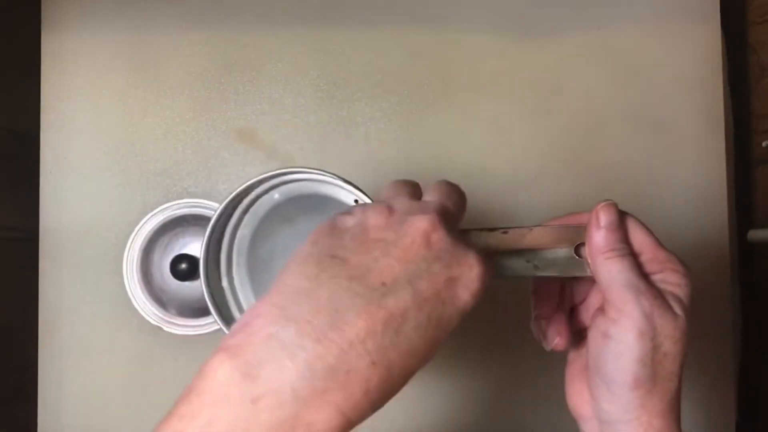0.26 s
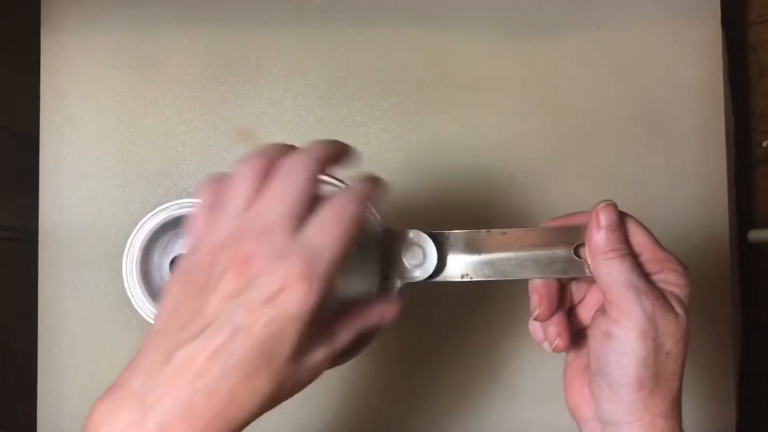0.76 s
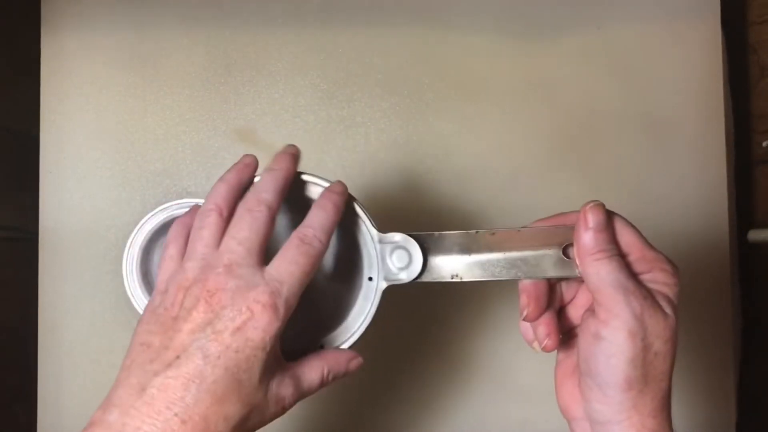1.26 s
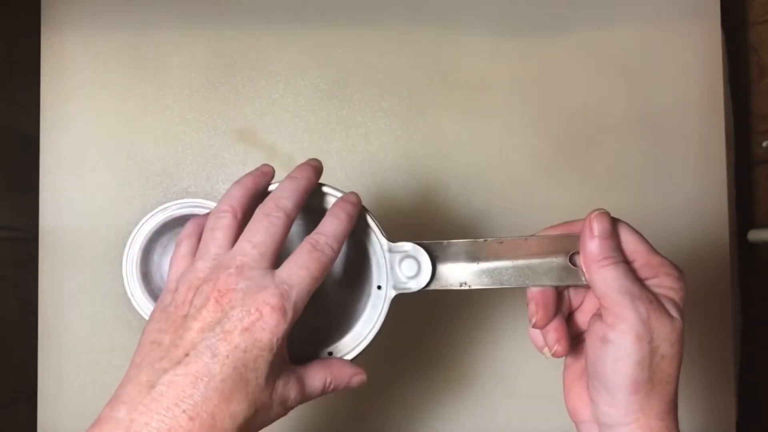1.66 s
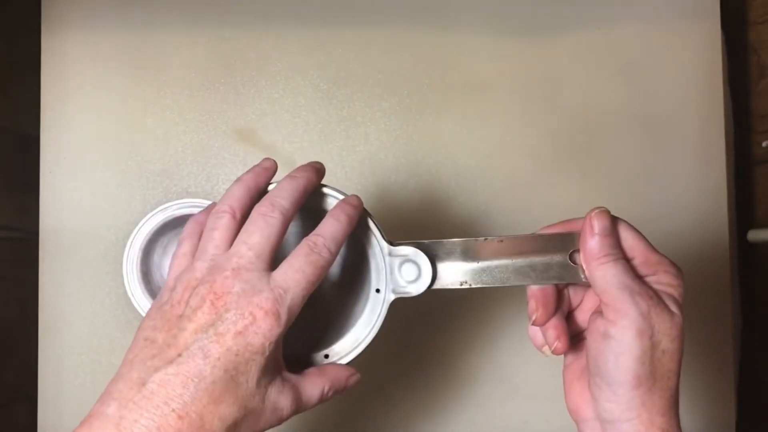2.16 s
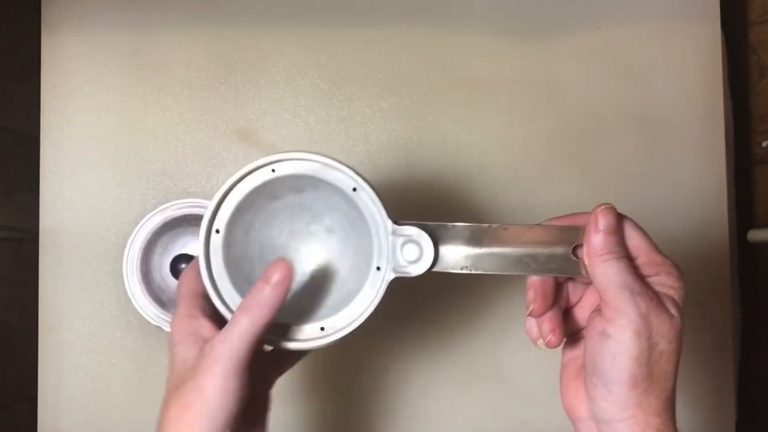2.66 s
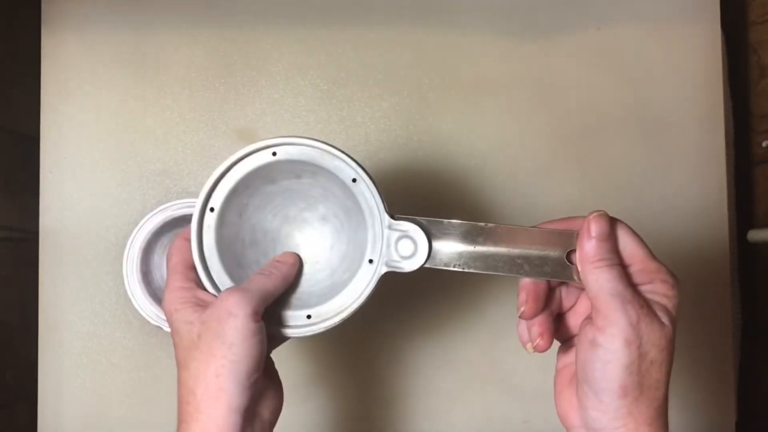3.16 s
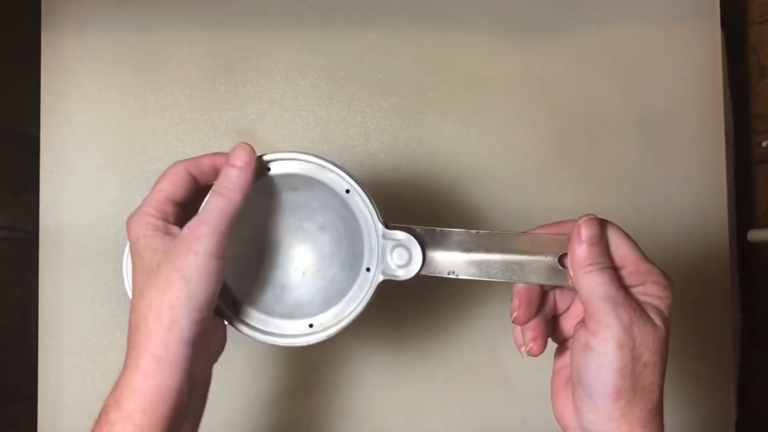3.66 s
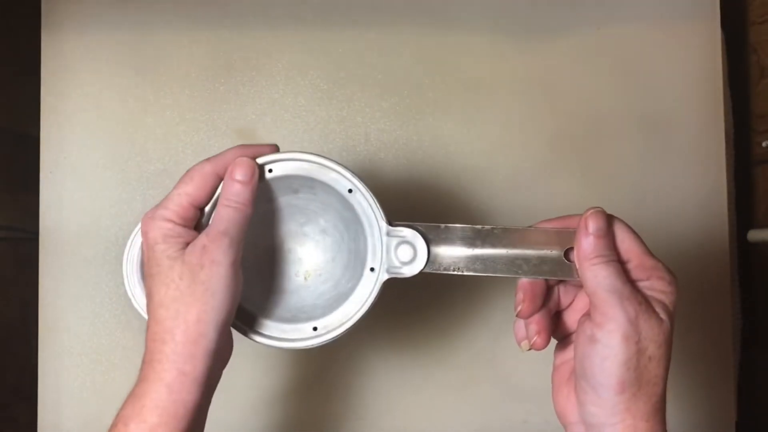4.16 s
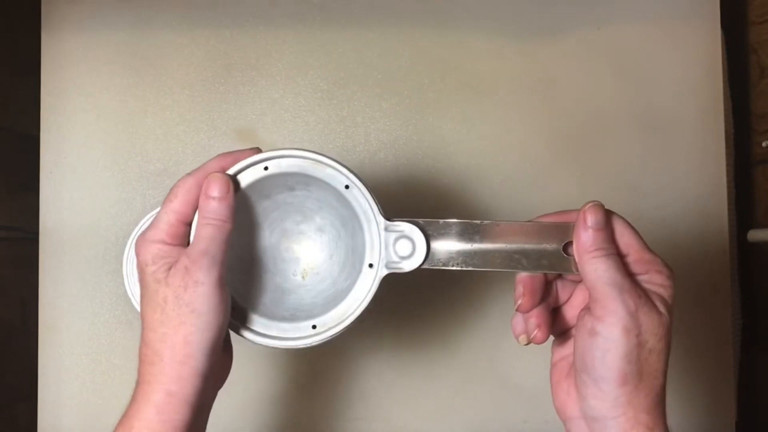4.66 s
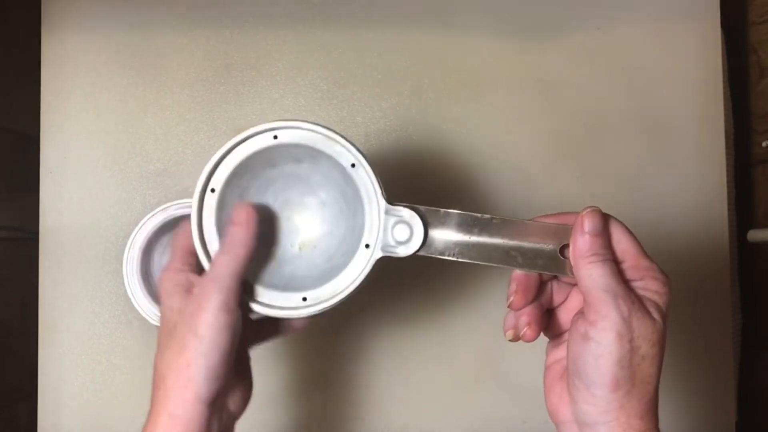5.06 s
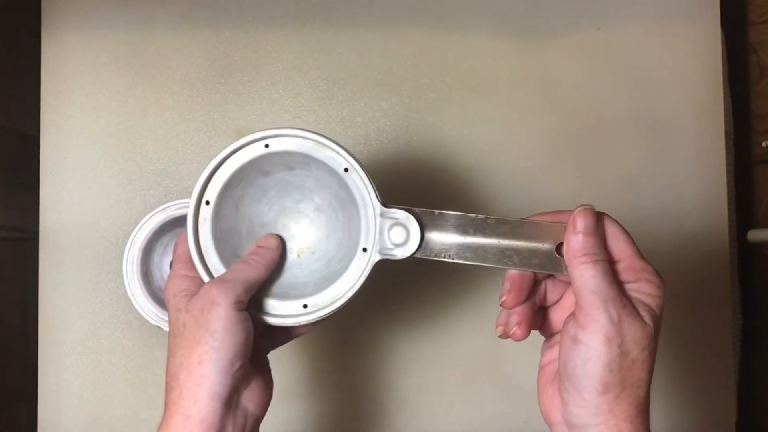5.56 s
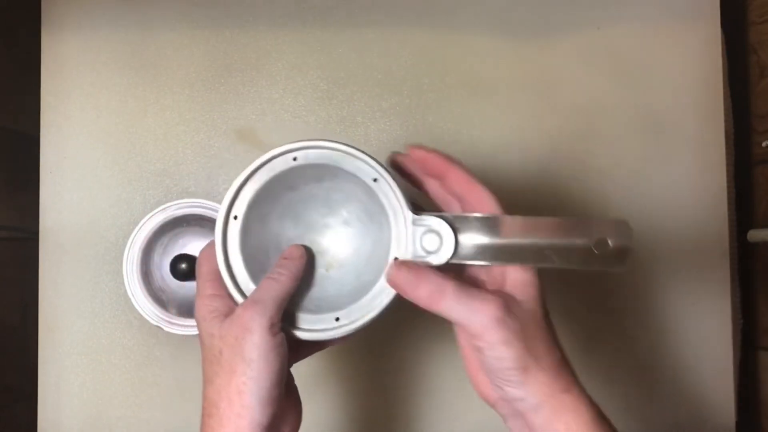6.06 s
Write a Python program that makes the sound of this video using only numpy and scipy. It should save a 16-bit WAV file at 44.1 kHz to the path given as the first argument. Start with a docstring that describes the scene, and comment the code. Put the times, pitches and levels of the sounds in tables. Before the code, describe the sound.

Close up in a quiet kitchen, lightweight aluminum rattles and rings briefly as a cup drops into a small handheld pan. After a lull of soft finger friction, the pieces knock together a few more times, with gentle scuffs and faint squeaks in between and a last tap at the end. A low appliance hum, slight hiss and very faint electric whine continue underneath.

```python
"""Over a low appliance hum, a faint electric whine and hiss, a thin aluminium cup clatters into its
small pan in a quiet kitchen and is then shifted about by hand. Each impact excites the normal modes
of the metal and of the air between the two shells, and the holding hand damps them quickly.
Rubbing fingers drive the metal by stick-slip friction, and now and then a single mode squeaks."""
import sys
import numpy as np
from scipy import signal
from scipy.fft import rfft, irfft
from scipy.io import wavfile

SR = 44100
rng = np.random.default_rng(int(sys.argv[2]) if len(sys.argv) > 2 else 0)


def transcribe(u):
    """Save the signal u as a 16-bit wav file named by the first command-line argument.

    u: samples, shape (n,) or (channels, n), limited to [-1, 1]; the rate is SR.
    q: integer samples, one column per channel.
    """
    v = np.clip(np.atleast_2d(u).T, -1, 1)
    q = np.round(v * 32767).astype(np.int16)
    wavfile.write(sys.argv[1], SR, q)


N = 278712
CUTOFF_HZ = 16300

# Normal modes of the pan, by the part that carries them. Each row: frequency in Hz,
# relative level in dB, nominal t60 in seconds (scaled for each kind of touch).
BOTTOM_MODES = [(573.8, 3, 0.099), (650, -9, 0.11)]
WALL_MODES = [(749, -24, 0.19), (918, -15, 0.14), (1013, -12.5, 0.047), (1130, -6, 0.038),
              (1241.6, -3.5, 0.086)]
FLANGE_MODES = [(1620, -5, .05), (1915, 0, .06), (2090, -6, .05), (2570, -9, .05), (2970, -4, .05)]
RIM_MODES = [(3490, -6, .06), (3745, -3, .06), (4160, -8, .04), (4320, -4, .07), (4760, -5, .05),
             (4900, -1, .04), (5070, -5, .05), (5345, -2, .05), (6100, -9, .06), (6330, -6, .05),
             (7255, -2, .06), (7555, -7, .04)]
EDGE_MODES = [(8322, -2, 0.07), (9020, 4, 0.027), (10120, -0.5, 0.03), (11490, 6.5, .035),
              (11800, -8, 0.038), (15000, -6, .035), (13580, 2.5, 0.033)]


def amp(db):
    """Amplitude ratio of a level in decibels."""
    return 10 ** (np.asarray(db) / 20)


def unit_rms(x):
    """Normalisation to unit mean power."""
    return x / np.sqrt(np.mean(x ** 2) + 1e-20)


def ring(force, hz, t60):
    """Damped harmonic oscillator: a unit impulse starts a decaying sine of height 1."""
    r, w = amp(-60 / (t60 * SR)), 2 * np.pi * hz / SR
    return signal.lfilter([0, np.sin(w)], [1, -2 * r * np.cos(w), r * r], force + 1e-18)


def band(x, low_hz, high_hz):
    """Butterworth band-pass filtering."""
    return signal.sosfilt(signal.butter(2, [low_hz, high_hz], "band", fs=SR, output="sos"), x)


def coloured(spectrum):
    """Spectral shaping of white noise, at unit rms."""
    hz, db = np.transpose(spectrum)
    bins_hz = np.maximum(np.arange(N // 2 + 1) * SR / N, 1)
    gain = amp(np.interp(np.log(bins_hz), np.log(hz), db))
    return unit_rms(irfft(rfft(rng.standard_normal(N)) * gain, N))


def background():
    """Superposition of narrow-band noise (wavering hum), a harmonic series (whine) and broadband air."""
    # Each row: centre frequency in Hz, bandwidth in Hz, level in dB.
    hum_lines = [(58.8, 13, -57.5), (119.7, 1.5, -63), (136.3, 1.6, -71), (175, 3.4, -72.5)]
    # Room air and hiss. Each row: frequency in Hz, relative spectral density in dB.
    air_spectrum = [(15, -42.5), (25, -7.5), (58, 2), (121, -7), (295, -24.5), (347, -20.5), (432, -28),
                    (723, -27.5), (1060, -29.5), (2960, -36), (4700, -40), (6160, -39), (7450, -42.5),
                    (14300, -41), (16400, -51.5)]
    whine_hz, tilt_db = 991.6, -.75
    t = np.arange(N) / SR
    hum = sum(amp(db) * unit_rms(band(rng.standard_normal(N + SR), hz - width / 2, hz + width / 2)[SR:])
              for hz, width, db in hum_lines)
    whine = sum(amp(-83.5 + k * tilt_db) * np.sin(2 * np.pi * (k * whine_hz * t + rng.random()))
                for k in range(1, 16))
    return hum + whine + amp(-59) * coloured(air_spectrum)


def contact(level_db, hardness_db, bottom_db, hollow_hz, rim_hz, chatter_s, swell_s):
    """Modal excitation: a click or a swelling slide, with a dying chatter of bounces, rings the pan."""
    # Dense fine modes, heard as a crack, for wall, bottom, flange, rim and edge. Each row: lower and
    # upper band limit in Hz, share of the crack in dB, radiation gain of the whole part in dB.
    fine_modes = [(698.5, 1500, -5, -18), (420, 1000, -15.5, -17.5), (1401, 3200, 2, -21.5),
                  (2960, 5570, -0.5, -20.5), (8300, 21000, 4.5, -26.5)]
    # Bias of every contact towards wall, flange, rim and edge, in dB.
    bias_db = [.3, -1.5, 1.3, -1.8]
    grip = .85   # the holding hand shortens every ring
    coupling_db_per_octave = 6.5   # wall modes far from the hollow's pitch are driven less
    t = np.arange(8192) / SR
    swell = (1 - np.exp(-t / max(swell_s, 1e-6))) ** 1.9
    dying = amp(-60 * t / max(chatter_s, .003))
    bounces = rng.standard_normal(t.size) * (rng.random(t.size) < .06) * dying * swell * 0.46
    bounces[0] = swell_s == 0   # only a knock opens with a click
    crack = rng.standard_normal(t.size) * dying ** 0.5 * swell
    wall = [(hz, db - coupling_db_per_octave * abs(np.log2(hz / hollow_hz)), t60)
            for hz, db, t60 in WALL_MODES]
    hollow = [(hollow_hz, 3.5, .07)]   # the air pocket changes with how the cup sits
    nearest = [(rim_hz, 7.5, .045)]   # the rim mode that the point of contact favours
    # hard contacts reach higher
    wall_db, flange_db, rim_db, edge_db = level_db + hardness_db * np.arange(4) + bias_db
    parts = [(wall + hollow, wall_db), (BOTTOM_MODES, level_db + bottom_db), (FLANGE_MODES, flange_db),
             (RIM_MODES + nearest, rim_db), (EDGE_MODES, edge_db)]
    sound = 0
    for k, (modes, part_db) in enumerate(parts):
        low, high, fine_db, radiation_db = fine_modes[k]
        if k == 0:   # the wall cracks around the pitch of the hollow
            low, high = 0.91 * hollow_hz, 1.5 * hollow_hz
        tones = sum(amp(db + rng.normal(0, 3)) * ring(bounces, hz, grip * t60) for hz, db, t60 in modes)
        tones = unit_rms(band(tones, 0.69 * low, min(1.3 * high, CUTOFF_HZ)))
        fine = amp(fine_db) * unit_rms(band(crack, low, high))
        sound += amp(part_db + radiation_db) * (tones + fine)
    return sound


def knocks_and_scuffs():
    """Impact and sliding friction of metal on metal: a knock starts at once, a scuff swells briefly."""
    # Each row: start in seconds, drive level in dB, hardness in dB per step up the pan,
    # offset of the bottom in dB, resonance of the hollow in Hz, favoured rim mode in Hz.
    knocks = [(0.165, -57.5, -1.1, -14, 1175, 5200), (0.2673, -19, 2.5, -31, 1130, 7250),
              (0.308, -27, 0.2, -27, 1163, 5230), (0.468, -37, 1, -28, 1094, 5530),
              (0.5509, -29.5, -1, -19, 1060, 3590), (0.5905, -34.5, -0.35, -24, 1230, 5340),
              (0.8772, -38, -5.5, -6.5, 893, 5180), (0.9703, -37.5, -4.5, -5.5, 1130, 3500),
              (1.0262, -28.5, -0.6, -1, 1350, 7260), (1.0669, -39.5, -8.5, -35, 894, 5780),
              (2.3105, -43, -5, -18, 695, 4800), (2.7894, -29, -11.5, 0.5, 950, 4800),
              (2.828, -21.5, -4.5, -1, 893, 4600), (2.8394, -24.5, -2, -2, 876, 4900),
              (2.8479, -27.5, -1.9, -5.5, 838, 3400), (2.8684, -41.5, -9, -20, 804, 3500),
              (3.7235, -26, -1.04, 2.8, 1005, 5100), (3.7324, -23.5, -8, -2.5, 895, 5300),
              (4.0112, -60.5, 3.5, 1.1, 904, 4000), (4.2782, -20.5, -0.33, -10, 743, 4850),
              (4.282, -23.5, -4, -25, 1278, 3460), (4.3064, -40.5, -1.5, -30, 770, 3430),
              (4.5137, -35, -1.2, 11, 944, 2780), (4.5444, -40, -7.5, 1, 1090, 2800),
              (5.222, -52.5, -5.5, 1, 843, 3680), (5.5984, -54.5, -8, 3.5, 1793, 3660),
              (5.6126, -57.5, -1.4, 3.5, 1303, 6600), (5.65, -59.5, 0.2, 9.5, 886, 3780),
              (5.704, -50, -13, 0, 1660, 6270), (6.213, -31, -4.5, 8, 700, 4030)]
    # Each row: as for a knock, then the t60 of the chatter in seconds.
    scuffs = [(0.24, -66.5, 3, -15, 1130, 5200, 0.045), (0.857, -59.5, 2, -13, 905, 5970, 0.051),
              (0.288, -30.5, 0.6, -14, 1218, 4430, 0.063), (0.3719, -45, -6, -18, 1197, 4410, 0.03),
              (0.4874, -40, -2.5, -26, 1026, 4410, 0.21), (0.5174, -41.5, -1.5, -12, 980, 5300, .078),
              (0.5696, -33, -3, -12, 1010, 4630, 0.048), (0.8855, -42, -7, -16, 874, 3430, 0.033),
              (0.9394, -42, -5, -4, 1070, 5100, 0.13), (0.9855, -30, -3.5, -6, 1283, 3560, 0.092),
              (1.0092, -27.5, -1, -14, 1008, 5080, 0.046), (1.2424, -60.5, -4.5, 11, 700, 3960, .06),
              (1.7366, -53.5, -5.5, 4.5, 1207, 5340, 0.056), (1.7693, -57, -4.5, 1, 1202, 3280, 0.045),
              (2.3254, -46, -11, 1.1, 1295, 4700, 0.026), (3.522, -58.5, -1.1, -11.5, 1250, 4900, .078),
              (3.8834, -60, 0.1, 8.5, 1144, 6150, .048), (4.678, -58, -1.1, -19, 1310, 5670, .033),
              (4.711, -56, -2, -16, 1240, 6560, 0.07), (4.7698, -58.5, 0.3, -4, 1200, 4330, 0.091),
              (5.0588, -61, -2, -18, 1290, 4600, 0.028), (5.1342, -55.5, -3.5, -16, 1228, 4270, 0.028),
              (5.2532, -61, -2, -2, 1300, 4190, 0.021), (5.3468, -64, 4.1, -7, 1280, 5600, 0.015),
              (5.3918, -48, -3, -22, 870, 3730, .03), (6.107, -56.5, -4, 7, 1332, 4190, 0.022)]
    knock_chatter_s, scuff_swell_s = .033, .007
    events = [row + (knock_chatter_s, 0) for row in knocks] + [row + (scuff_swell_s,) for row in scuffs]
    out = np.zeros(N + SR)
    for start_s, *settings in events:
        sound, at = contact(*settings), round(start_s * SR)
        out[at:at + sound.size] += sound
    return out[:N]


def free_cup():
    """Free vibration: untouched modes sing on after a knock until a hand damps the cup."""
    # Each row: start in seconds, levels of the low pair, middle pair and high mode in dB,
    # seconds until the hand lands.
    free_rings = [(0.268, -62.5, -35.5, -70, .2), (0.307, -50.5, -63.5, -67, 0.14),
                  (0.597, -50.5, -63, -75, .12), (1.036, -71, -58.5, -46, 0.12),
                  (4.334, -67, -59, -59, 0.031), (6.239, -70, -73, -79, 0.065)]
    # Cup modes in those three groups. Each mode: frequency in Hz, relative level in dB, t60 in seconds.
    mode_groups = [
        [(2853, 0, .2), (2966, -2, .15)],
        [(4414, 0, .33), (4317, -6, .33)],
        [(5782, 0, .19)],
    ]
    out, t = np.zeros(N + SR), np.arange(SR // 2) / SR
    click = 1. * (t == 0)
    for start_s, *levels_db, free_s in free_rings:
        song = sum(amp(group_db + db) * ring(click, hz, t60)
                   for group_db, modes in zip(levels_db, mode_groups) for hz, db, t60 in modes)
        hand_damping = amp(-60 * np.maximum(t - free_s, 0) / .05)
        at = round(start_s * SR)
        out[at:at + t.size] += song * hand_damping
    return out[:N]


def thuds():
    """Impulse response of one low, heavily damped mode: hard knocks jolt the pan in the hand."""
    # Each row: start in seconds, impulse level in dB.
    jolts = [(0.27, -46.5), (.311, -48), (2.84, -50.5), (3.725, -54), (4.281, -48)]
    start_s, db = np.transpose(jolts)
    clicks = np.zeros(N)
    clicks[np.round(start_s * SR).astype(int)] = amp(db)
    return band(ring(clicks, hz=345.5, t60=.05), 150, 680)


def flicker(rate_hz):
    """Low-pass filtering turns white noise into a slow wobble of unit rms."""
    r = np.exp(-2 * np.pi * rate_hz / SR)
    return unit_rms(signal.lfilter([1], [1, -2 * r, r * r], rng.standard_normal(N + SR))[SR:])


def swelling(peak_s, swell_s, fade_s):
    """Amplitude envelope of one stroke: the samples it spans and its gain there."""
    depth_db, roundness = 24, 1.32   # roundness 1 gives a pointed top, 2 a rounded one
    span = slice(int((peak_s - 2 * swell_s) * SR), min(int((peak_s + 2 * fade_s) * SR), N))
    t = np.arange(span.start, span.stop) / SR
    from_peak = np.maximum((peak_s - t) / swell_s, (t - peak_s) / fade_s)
    return span, amp(-depth_db * from_peak ** roundness)


def stroke_gains():
    """Incoherent addition: overlapping strokes sum in power, giving the gains of shell, rim and skin."""
    # Finger strokes on the metal. Each row: peak time, swell and fade in seconds, shell level in dB,
    # rim and skin levels in dB relative to the shell.
    strokes = [(1.26, 0.062, 0.05, -62.5, -16, -13), (1.5, 0.029, 0.029, -62.5, -15.5, -21),
               (1.76, 0.042, .06, -63, -14, -13), (1.93, .11, 0.077, -73, -18, -11.5),
               (2.062, 0.073, 0.056, -63, -7, -7), (2.3, 0.054, .008, -62.5, -9, -14.5),
               (2.7, .05, .04, -73, -12, -9), (2.785, 0.039, 0.0072, -64, -7, -22.5),
               (2.92, .03, .03, -69, -15, -25), (3.07, 0.11, 0.11, -61.5, -10, -5),
               (3.16, 0.22, .13, -61.5, -5.5, -4.5), (3.27, .09, 0.079, -73, -7.5, 4.5),
               (3.44, 0.094, .07, -71, -6, 2.5), (3.53, 0.025, 0.072, -69.5, -7, 7.5),
               (3.701, .21, 0.032, -69, -8, 0), (3.904, 0.11, 0.067, -59, -11, -7.5),
               (4.002, 0.11, 0.017, -58.5, -11, -11), (4.011, 0.0039, 0.054, -61, -5, 5),
               (4.18, 0.084, 0.11, -56, -12, -17), (4.266, .15, 0.036, -51, -6.5, -6),
               (4.502, 0.12, 0.035, -51.5, -16, -14), (4.591, 0.077, 0.061, -64, -5.5, 0),
               (4.79, 0.19, 0.18, -63.5, -5, 0), (4.975, 0.16, 0.18, -58, -1, -2),
               (5.075, .06, 0.02, -64, -5.5, -3.5), (5.14, .03, 0.11, -72, -7.5, -8),
               (5.317, 0.13, 0.021, -58, -8.5, -7.5), (5.349, 0.014, 0.021, -49, -12, -4.5),
               (5.4, 0.012, 0.028, -48.5, -10.5, -4), (5.655, 0.21, 0.028, -67, -20, -5),
               (5.71, .021, 0.11, -59.5, -24.5, -17), (6.112, 0.061, 0.056, -64.5, -12, -3),
               (6.205, 0.058, .008, -67, -2.5, -3), (6.27, 0.034, 0.052, -65, -8.5, -2)]
    hold_from_s, hold_db = 1.3, [-79.5, -103, -88.5]   # the resting hand creeps: shell, rim, skin
    power = amp(hold_db)[:, None] ** 2 * (np.arange(N) / SR > hold_from_s)
    for peak_s, swell_s, fade_s, shell_db, rim_db, skin_db in strokes:
        span, gain = swelling(peak_s, swell_s, fade_s)
        power[:, span] += (amp(shell_db + np.array([[0], [rim_db], [skin_db]])) * gain) ** 2
    return np.sqrt(power)


def fingers():
    """Stick-slip friction: dense tiny slips drive the damped metal, and skin adds a bright hiss."""
    # Rim modes that a sliding finger wakes most.
    # Each row: frequency in Hz, relative level in dB, nominal t60 in seconds.
    sheen_modes = [(4800, 5, .04), (6100, 0, .07)]
    # Hiss of sliding skin. Each row: frequency in Hz, relative spectral density in dB.
    skin_spectrum = [(4120, -29.5), (7000, -10), (8970, -6.5), (13200, -0.5), (15100, 3), (16000, 6),
                     (16300, -5)]
    slips_per_s = 2200
    sizes = amp(2.0 * np.minimum(rng.exponential(1, N), 4))
    slips = rng.standard_normal(N) * sizes * (rng.random(N) < slips_per_s / SR)
    place = [amp(4.8 * flicker(6.3)) for _ in range(4)]

    def rubbed(modes, t60_scale):
        """Forced vibration: the moving finger favours now some modes, now others."""
        return sum(amp(db) * place[k % 4] * ring(slips, hz, t60_scale * t60)
                   for k, (hz, db, t60) in enumerate(modes))

    shell = band(rubbed(BOTTOM_MODES + WALL_MODES + FLANGE_MODES, 0.59), 450, 2200)
    rim = band(rubbed(RIM_MODES + sheen_modes, 1.4), 3300, 6350)
    rim = unit_rms(rim) + amp(0.5) * unit_rms(band(slips, 4000, 8100))
    edge = band(rubbed(EDGE_MODES, 0.54), 8000, 17000)
    skin = coloured(skin_spectrum) + amp(-9) * unit_rms(edge)
    layers = unit_rms(shell), unit_rms(rim), unit_rms(skin)
    catching = amp(2.0 * flicker(42))   # the finger catches and lets go
    return catching * np.sum(stroke_gains() * layers, axis=0)


def squeaks():
    """Resonance: the friction noise of a sliding finger makes a single mode sing."""
    # Each row: peak time, swell and fade in seconds, level in dB, frequency in Hz.
    slides = [(2.06, 0.061, 0.074, -69.5, 1750), (2.285, 0.031, .03, -75.5, 4694),
              (3.15, .15, 0.14, -69, 1754), (3.88, .11, .06, -70, 1857), (3.17, 0.066, 0.077, -70, 4700),
              (3.2, 0.098, 0.14, -70.5, 6000), (4.191, .07, .06, -69.5, 3396),
              (4.97, .13, 0.073, -57, 4820)]
    out = np.zeros(N)
    for peak_s, swell_s, fade_s, db, hz in slides:
        span, gain = swelling(peak_s, swell_s, fade_s)
        out[span] += amp(db) * gain * unit_rms(ring(rng.standard_normal(gain.size), hz, t60=0.033))
    return out


def kitchen(x):
    """Reverberation: a diffuse tail decays exponentially after the first wall reflection."""
    t60_s, first_wall_s = 0.18, .006
    t = np.arange(SR // 2) / SR
    tail = band(rng.standard_normal(t.size), 260, 7000) * amp(-60 * t / t60_s) * (t > first_wall_s)
    return signal.fftconvolve(x, tail / np.sqrt(np.sum(tail ** 2)))[:N]


def scene():
    """Superposition of the close pan, its faint reverberation and the background, in mono."""
    radiates_above_hz = 579   # a small shell hardly radiates its lows
    pan = knocks_and_scuffs() + free_cup() + fingers() + squeaks()
    pan = signal.sosfilt(signal.butter(6, radiates_above_hz, "high", fs=SR, output="sos"), pan)
    return (pan + thuds() + amp(-27) * kitchen(pan) + background())[None]


def record(dry):
    """Band limiting: the deepest bass is rolled off and the top is cut steeply."""
    dry = signal.sosfilt(signal.butter(4, 42, "high", fs=SR, output="sos"), dry)
    return signal.sosfilt(signal.cheby2(14, 60, CUTOFF_HZ, fs=SR, output="sos"), dry)


dry = scene()
out = record(dry)
transcribe(out)
```